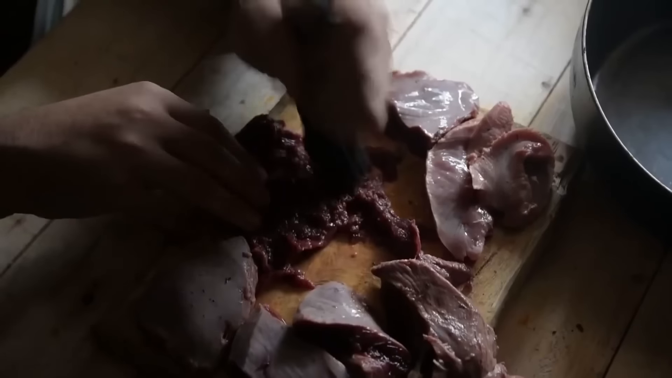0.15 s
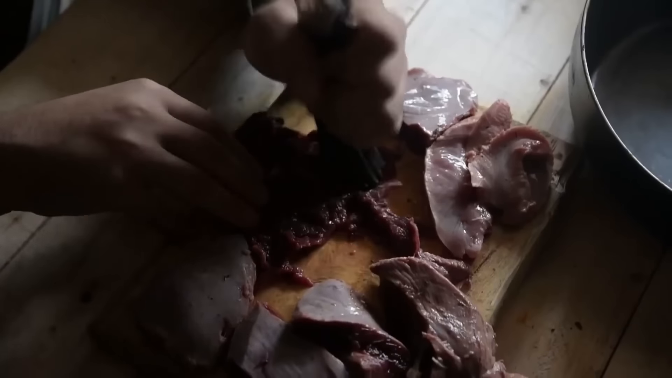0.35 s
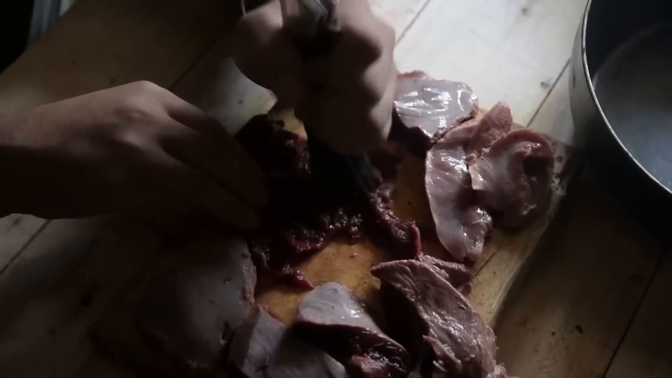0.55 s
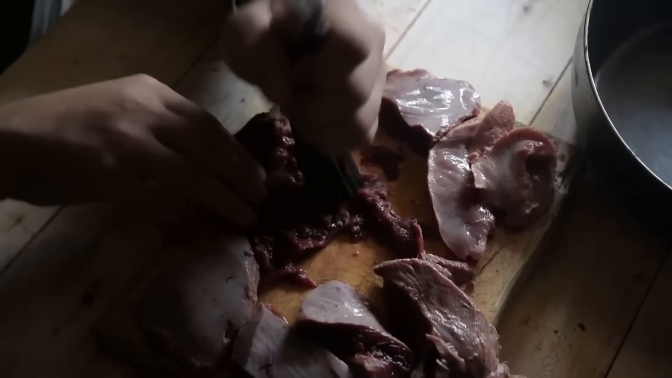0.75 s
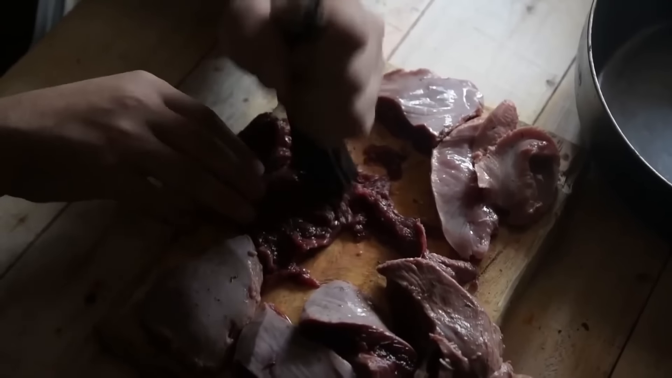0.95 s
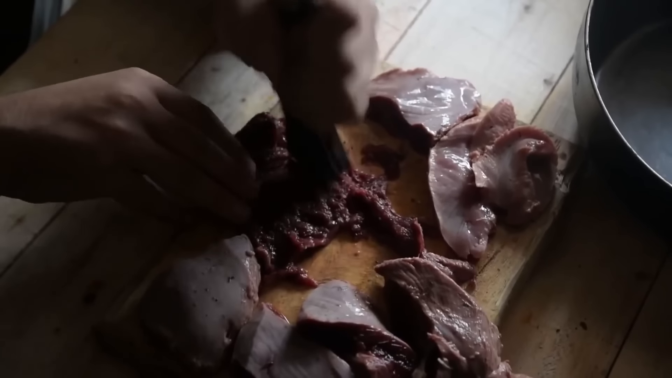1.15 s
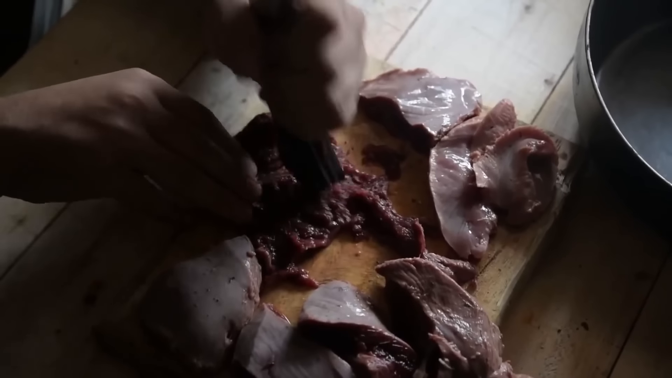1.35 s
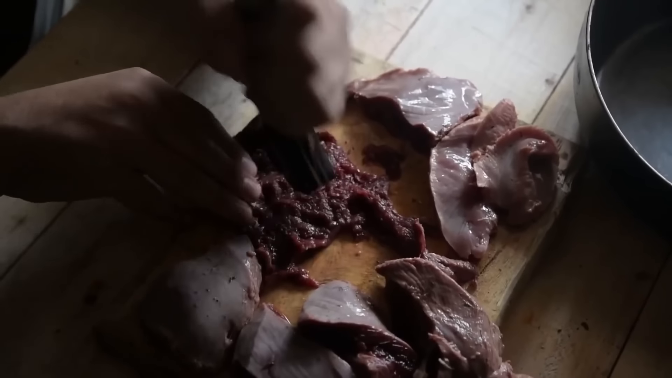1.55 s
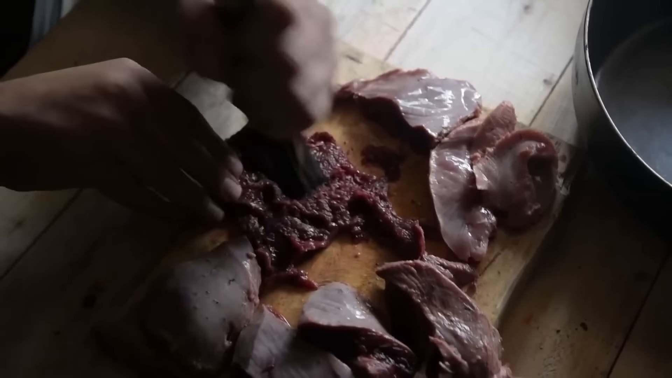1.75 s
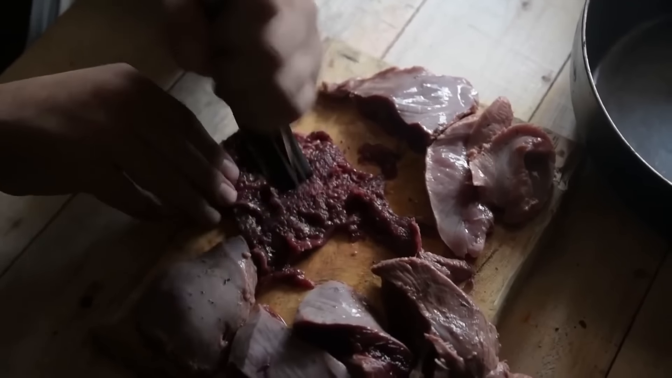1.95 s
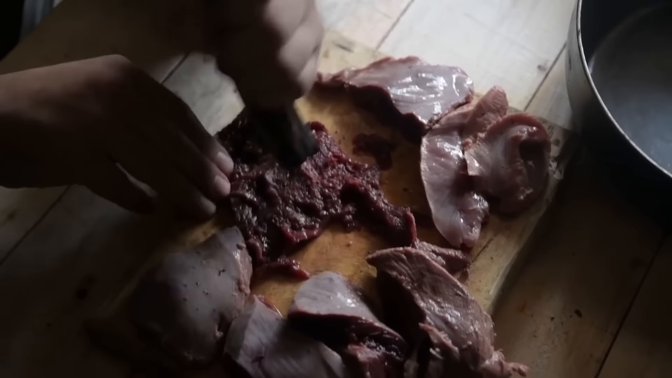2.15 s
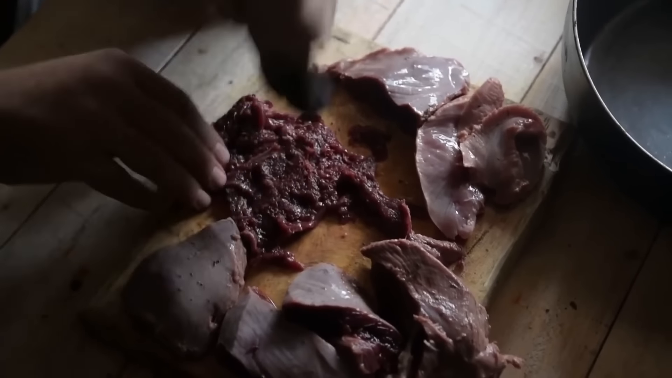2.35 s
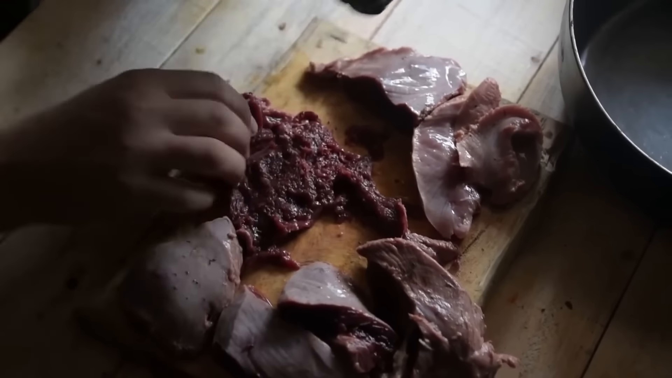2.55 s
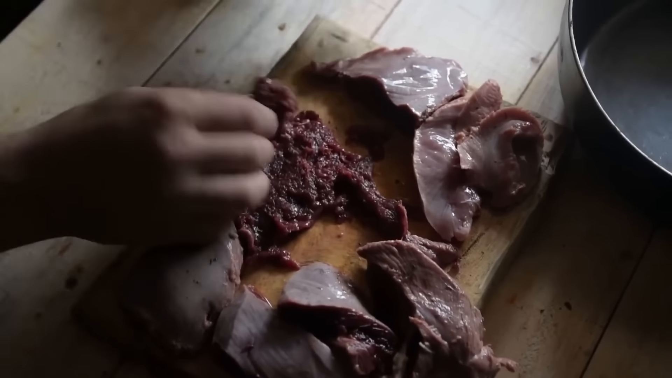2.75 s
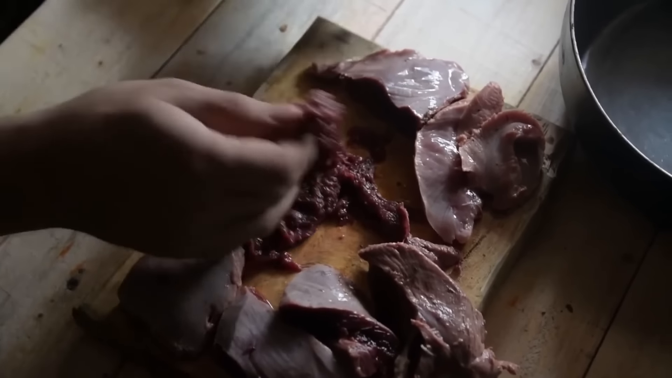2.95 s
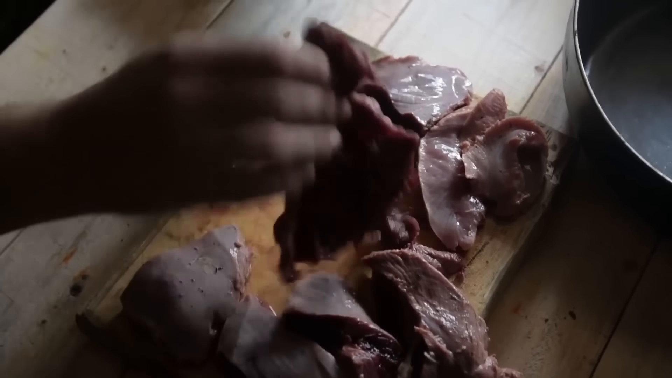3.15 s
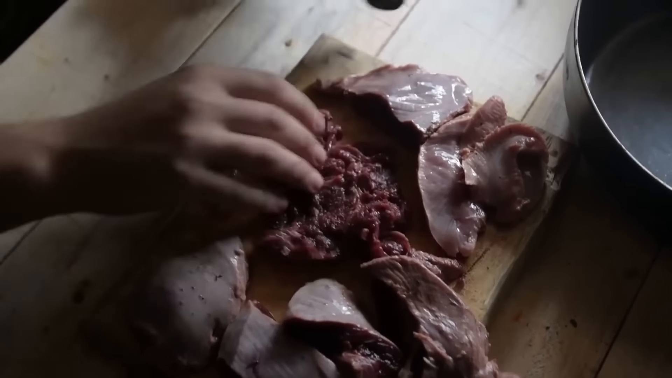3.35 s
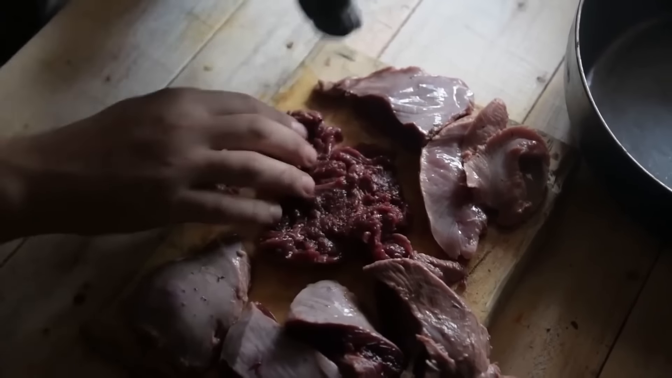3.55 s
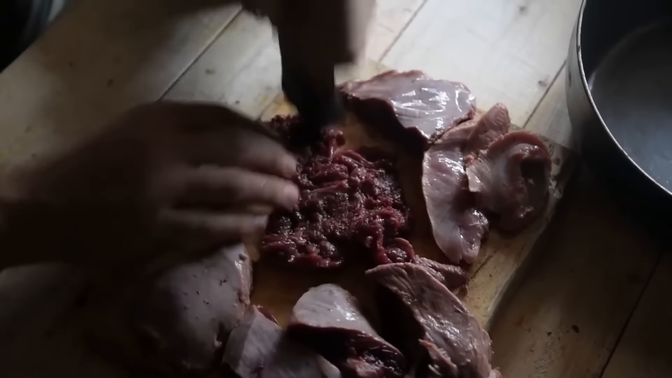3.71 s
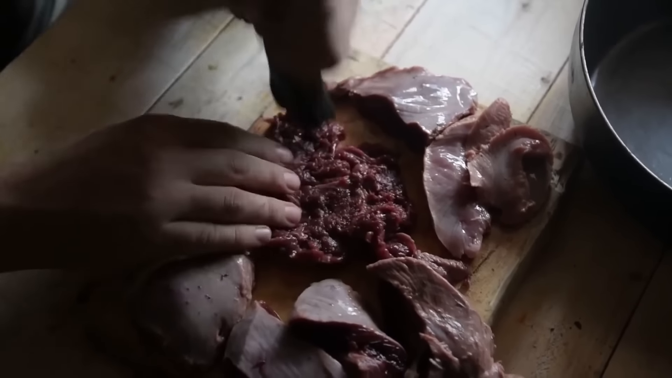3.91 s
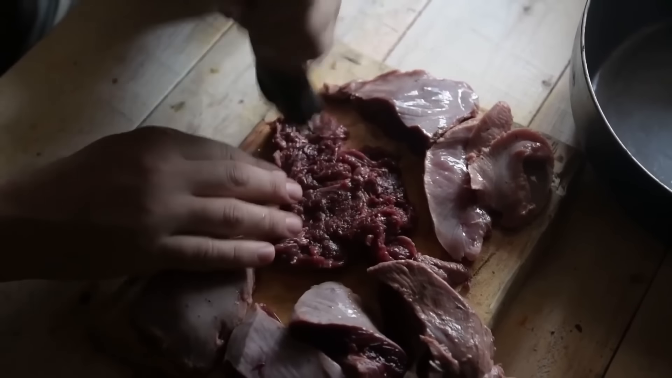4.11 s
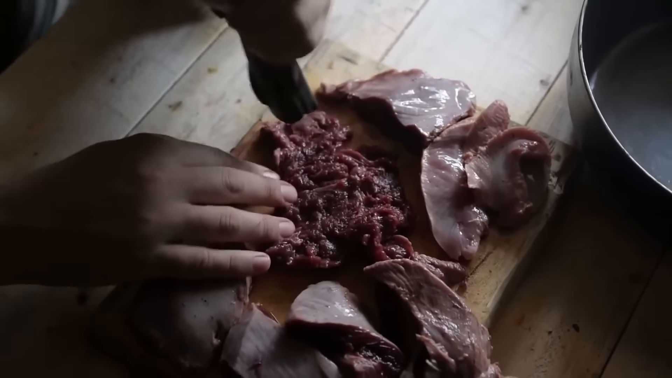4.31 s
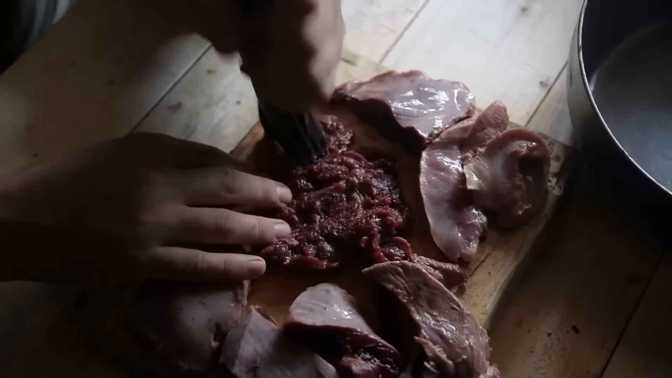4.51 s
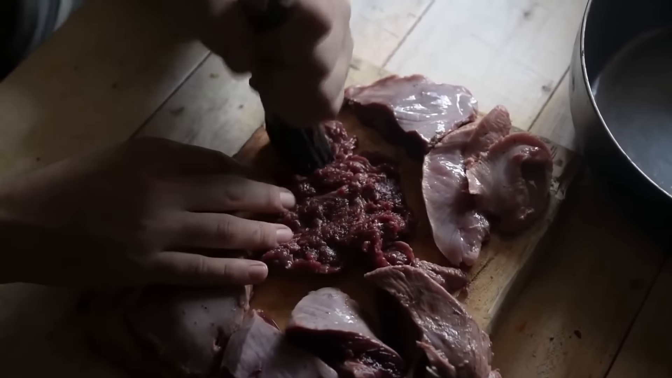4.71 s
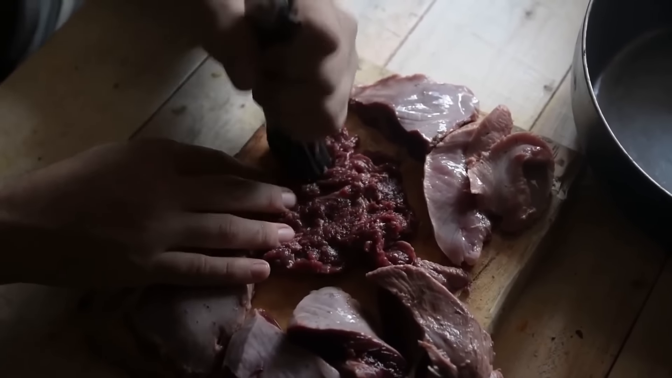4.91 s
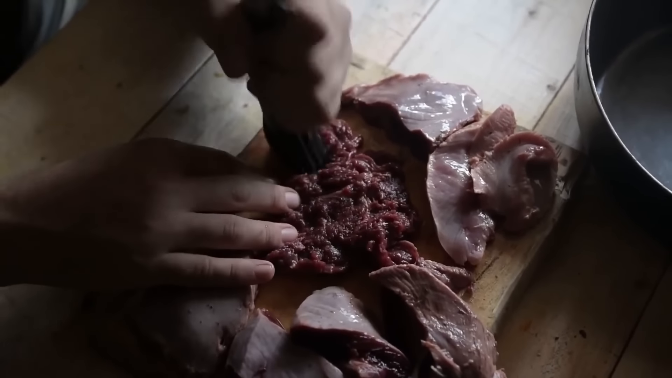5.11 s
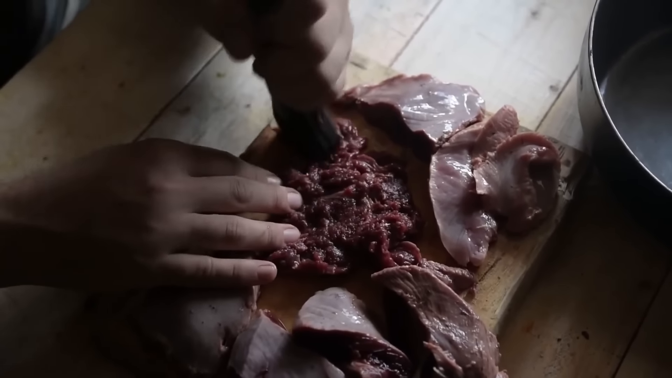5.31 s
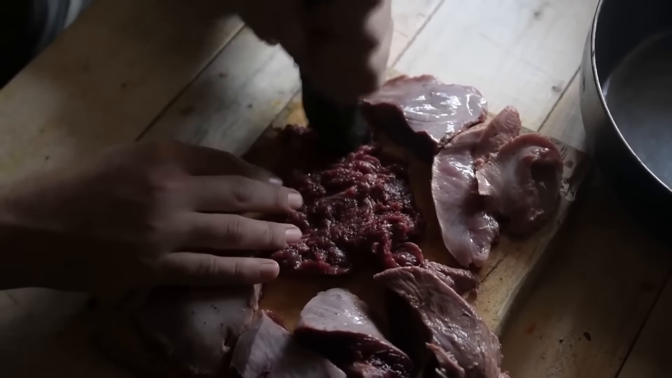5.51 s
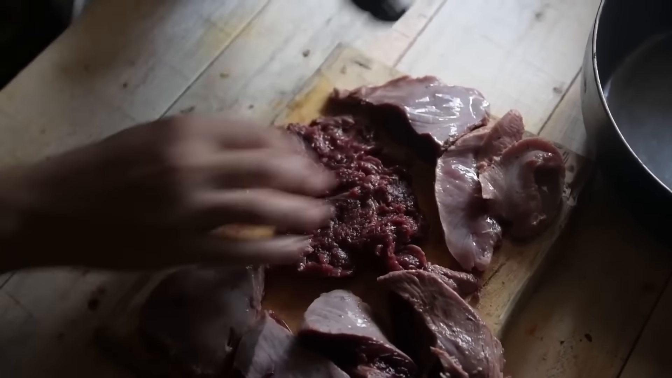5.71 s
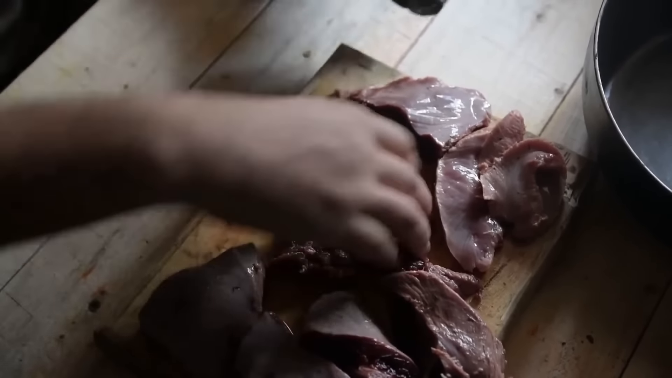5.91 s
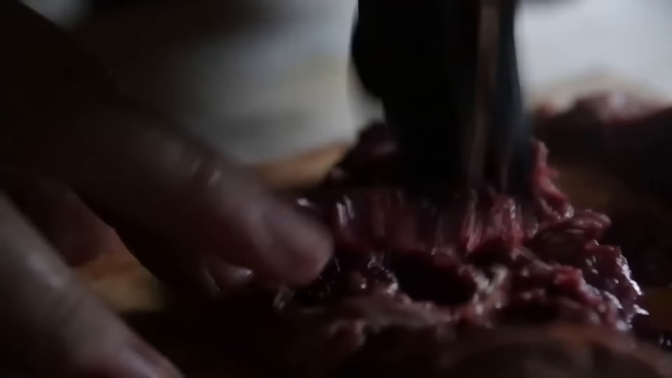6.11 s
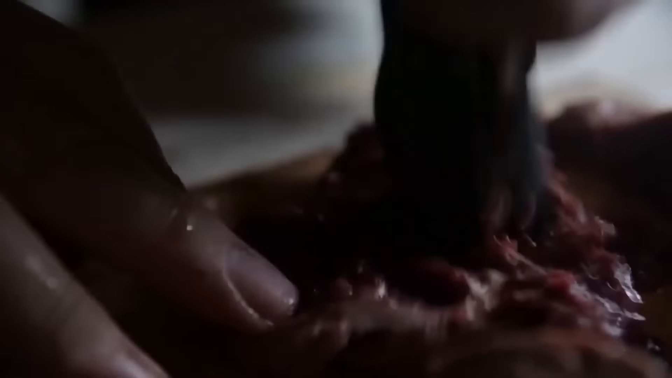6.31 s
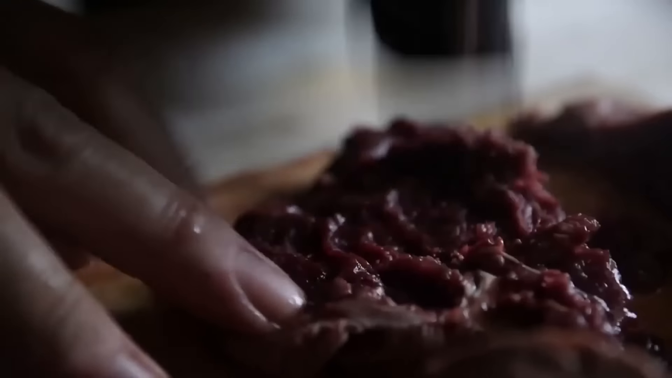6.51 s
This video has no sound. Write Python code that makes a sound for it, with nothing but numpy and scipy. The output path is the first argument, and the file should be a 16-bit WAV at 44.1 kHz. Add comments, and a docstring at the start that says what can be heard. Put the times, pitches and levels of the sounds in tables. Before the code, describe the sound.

A spiked mallet pounds raw meat on a wooden board on a table, heard up close in a small kitchen. From the start until about 2.3 seconds, dull thuds come evenly, about five a second, each with a wet smack and sticky crackle. The loose board sometimes knocks back, and a harder blow lands at 1.7. From 2.4 to 3.7 the pounding stops while a hand lifts and turns the meat with soft squelches, light wooden bumps and a sharp wet slap near 3.35. Two heavy blows at 3.8 and 4.0 begin a second run, which continues more lightly, with the board clattering, until about 5.7. After a brief gap, two more heavy, wet blows land at 6.1 and 6.4. The hardest hits are slightly overloaded. Reflections are short and tight, and a faint rumble and hiss continue underneath.

```python
"""A small kitchen: close up, a spiked mallet pounds raw meat on a wooden board lying on a plank table.
Each blow smacks the wet meat, then thuds through board and table. The spikes tear free with sticky
crackles, the loose board knocks back, and a hand turns the meat between the bursts.
Short reflections and a bed of rumble and hiss sit behind; the hardest blows overload softly."""
import sys
import numpy as np
from scipy import signal
from scipy.fft import rfft, irfft, next_fast_len
from scipy.io import wavfile
from scipy.ndimage import uniform_filter1d

SR = 44100
rng = np.random.default_rng(int(sys.argv[2]) if len(sys.argv) > 2 else 0)


def unload_wav(signal):
    """Save mono or channel-first audio to the path in sys.argv[1] as 16-bit WAV at rate SR, clipped to [-1, 1]."""
    wavfile.write(
        sys.argv[1],
        SR,
        np.round(np.clip(np.atleast_2d(signal).T, -1, 1) * 32767).astype(np.int16),
    )


N = 289737

# The mallet lands: t/s, thud/dB, table boom/dB, board knock/dB, squeezed meat/dB
BLOWS = [(0.056, -22, -0.5, -11.5, -44), (0.235, -31, -0.5, -14.5, -50.5), (0.42, -33, 1, -19, -43),
         (0.604, -34, 1.5, -12, -47), (0.794, -29.5, 7, -6, -45.5), (0.989, -25.5, 1.5, -7.5, -47),
         (1.17, -25.5, 2.5, -7, -43), (1.362, -25.5, 3.5, -7, -45), (1.536, -26, 4.5, -9, -53.5),
         (1.72, -14.5, -3.5, 1, -44), (1.92, -39, 5, -15, -44), (2.101, -37.5, 5.5, -10, -45),
         (2.302, -25, -3, -12.5, -42), (3.831, -11, -9, 0.5, -45.5), (4.031, -7.5, -11, 2, -43),
         (4.245, -29, -7, -8, -47), (4.508, -27, 0.5, -13, -37.5), (4.742, -30.5, 4, -15.5, -40.5),
         (4.974, -41, -7, -15, -46), (5.173, -30.5, 6, -4.5, -45.5), (5.358, -38.5, -12, -12.5, -46.5),
         (5.565, -28.5, -11, -22.5, -42.5), (6.112, -9.5, -9.5, -14, -39), (6.363, -9, -6.5, -10, -36)]
# The loose board or the meat drops back: t/s, thud/dB, table boom/dB, board knock/dB
KNOCKS = [(.935, -29, -8.5, -10), (1.683, -60.5, -8, 7.5), (1.868, -23.5, -4.5, -1), (1.992, -45, 2, -5.5),
          (2.642, -33, -12, -14), (3.39, -33, -8.5, -17), (3.537, -24, -12, -8.5), (3.71, -34, -9, -19.5),
          (3.937, -36.5, -0.5, -5.5), (4.141, -36, -3, 4), (4.224, -44, 2, 10.5), (4.346, -29, -9, -14.5),
          (4.587, -46, -6.5, 2), (5.021, -37.5, -10, -11), (5.219, -37.5, 3.5, -3.5), (5.4, -42, 2.5, -3),
          (5.595, -41.5, -9.5, 7), (5.716, -48.5, 17, -12)]
# Boom, body, knock and clack bands of a thud; the others are set against the body: from/Hz, to/Hz
THUD_BANDS = [(90, 170), (170, 400), (400, 800), (800, 1800)]
# Modes of board and table: f/Hz, level/dB, t60/s
WOOD_MODES = [(46.87, -11.5, .4), (70, -10, 0.37), (90, -22.5, .2), (120, 3.5, 0.28), (130.1, 4, 0.24),
              (160.3, 2.5, 0.19), (209.4, 2.5, 0.16), (243, -1, 0.18), (287, 1, 0.11), (311.2, -1.5, 0.073),
              (407.5, -6, 0.11), (525, -29.5, .08), (559, -1, 0.055), (602.2, -1, 0.08),
              (721.4, -8.5, 0.065), (911, -13, 0.11), (1032, -2.5, 0.031), (1193, -20, 0.081),
              (1405, -24, 0.045), (1562, -9, 0.047), (2037, -15, 0.055)]
# Dark and bright wash of weak plank modes: f/Hz, level/dB
PLANKS_LOW = [(60, 3.5), (150, 20), (350, 14.5), (700, -3.5), (2000, -29.5)]
PLANKS_HIGH = [(200, -7.5), (500, 9.5), (1200, 8.5), (2500, -11.5), (6000, -31)]
# Wet smacks: mid-rise t/s, peak level/dB, air pocket f/Hz, brightness (spit over slap)/dB, sizzle t60/s
SMACKS = [(0.0498, -22.5, 6600, 16, .071), (0.098, -37, 8900, 21, .12), (0.1036, -39.5, 2270, -8, .035),
          (0.1324, -44, 8950, 35, .074), (0.194, -38.5, 5850, 5, .02), (.2306, -28.5, 5170, 4, .026),
          (0.2593, -33.5, 2050, 14, .055), (.3007, -39.5, 9200, 24, .17), (0.413, -19, 3750, 13.5, .034),
          (0.4452, -26.5, 8100, 16, .098), (0.484, -45, 1620, 11, .044), (0.601, -33, 2000, 16.5, .13),
          (0.632, -40, 2710, 15, .077), (0.662, -42, 6200, 12, .03), (.671, -41, 6450, 21, 0.067),
          (.6921, -35, 7990, 42, .032), (.788, -31, 4130, 13, .055), (.8666, -36, 9100, 24, .047),
          (0.9846, -32.5, 2060, 18, .14), (1.0383, -45.5, 5600, 19, 0.13), (1.1608, -28, 3800, 13, .05),
          (1.2035, -30, 1240, 12.5, .046), (1.2229, -33.5, 5330, 2, .03), (1.358, -36, 2100, 6, .11),
          (1.3874, -36, 8900, 27, .17), (1.5301, -30, 9000, 8.5, .045), (1.5576, -37.5, 2160, -22, .13),
          (1.594, -39, 8800, 40, .055), (1.6841, -44, 1100, 3, .16), (1.716, -25.5, 1100, 1, .075),
          (1.773, -42.5, 9000, 39, .07), (1.9089, -16, 1540, 3, .026), (1.974, -32.5, 9500, 52, .045),
          (2.0945, -20, 1570, 10.5, .02), (2.1587, -29, 7300, 8.5, .055), (2.2928, -19.5, 3540, -1.5, .12),
          (2.3422, -30, 9100, 16, .042), (2.3543, -32.5, 8000, 50, .033), (2.4232, -45, 1660, 1, .055),
          (2.6864, -46, 3930, 1, .1), (2.7834, -46, 8800, 17, 0.16), (2.826, -45.5, 1190, 17, 0.055),
          (2.8496, -45, 8830, 39, .055), (2.895, -43, 4020, 22, 0.2), (3.0156, -50, 9050, 43, .1),
          (3.116, -40.5, 8900, 55, .055), (3.1815, -46.5, 4800, 13, .081), (3.3399, -36, 9300, 21, .02),
          (3.346, -16, 4800, 15, .05), (3.352, -13.5, 2950, 12, .03), (3.357, -17.5, 1635, 13, .025),
          (3.3933, -37, 9000, 33, .034), (3.4979, -49, 3600, 10, 0.068), (3.6055, -38.5, 3880, -4, .12),
          (3.7389, -51, 9450, 34, 0.051), (3.817, -44, 3840, -3.5, .087), (3.833, -33, 960, -12.5, .068),
          (3.9616, -40.5, 8800, 6, .055), (4.0142, -24.5, 8900, 12.5, .13),
          (4.0318, -22.5, 1000, 0.5, .018), (4.0638, -21.5, 4130, 9, .018), (4.242, -21.5, 1780, 8, .025),
          (4.2746, -17, 9200, 27, .073), (4.3185, -38.5, 3480, 14, .036), (4.502, -26, 5740, 2.5, .031),
          (4.5402, -46, 4180, -1, .17), (4.586, -42, 5700, 3, 0.043), (4.7373, -15.5, 6140, 2, .018),
          (4.776, -31, 6920, -1, .09), (4.8016, -38, 1570, -5, .055), (4.9656, -33, 6170, 1, .12),
          (5.025, -43.5, 8990, 6, .055), (5.17, -25.5, 1870, 6, .055), (5.2133, -24, 9200, 3, .092),
          (5.3547, -36, 9800, 9.5, .1), (5.4, -41, 5230, 3, .12), (5.49, -55, 3560, 5, .02),
          (5.5493, -29.5, 7600, 10, .055), (5.564, -33, 5900, 14, .055), (5.584, -30.5, 9600, 16, .055),
          (6.1095, -22.5, 1150, -11, .13), (6.1593, -37.5, 4830, 46, .17), (6.295, -52, 2610, -4, .055),
          (6.3537, -19, 2580, 11, .062), (6.418, -36.5, 8900, 16, .055)]
# A smack's three colours, from flat slap to thin spit: f/Hz, relative level/dB
SLAP_TONE = [(500, -19.5), (900, -11), (1500, 1), (2200, -7), (3500, -22.5), (6000, -40.5)]
SQUISH_TONE = [(800, -122), (2000, -10), (3500, 5.5), (5500, 7), (8000, -7), (13000, -15.5), (16000, -34)]
SPIT_TONE = [(3000, -48.5), (6000, -3.5), (7500, 0.5), (9200, 8), (10500, -0.5), (13000, -6.5),
             (16000, -18)]
# A smack's left-right phase spread: f/Hz, spread/rad
SMACK_PHASE_SPREAD = [(1000, 0.033), (2500, 0.58), (5000, 0.39), (12000, 0.54)]
# Moves of the hand: loudest t/s, level/dB, swell/(dB/s), fade/(dB/s)
HAND_MOVES = [(1.849, -50, 42.5, 150), (2.426, -44.5, 346.5, 337), (2.66, -53, 899, 201),
              (2.83, -51.5, 74, 96.5), (3.356, -34, 1504.5, 893), (3.612, -43.5, 194, 395),
              (5.764, -53.5, 250, 148.5)]
# Colour of sticky meat and of the noise bed: f/Hz, relative level/dB
STICKY_TONE = [(300, -36.5), (700, -3), (1200, -7.5), (2100, -4), (3500, -3.5), (6500, -8.5), (9000, -6.5),
               (12000, -15), (16500, -19)]
HISS_TONE = [(21, -38), (35, -3), (268, -1), (338, -3.5), (898, -8.5), (971, -8), (1220, -9.5),
             (1500, -9.5), (2390, -12), (2720, -11.5), (14100, -16), (16500, -20.5)]
# Stereo likeness of the noise bed: f/Hz, left-right correlation
HISS_CORRELATION = [(60, 0.56), (240, 0.11), (950, 0.32), (3770, 0.3), (15000, -0.022)]
# Where each layer sits in the stereo image: f/Hz, left over right/dB
WOOD_PAN = [(60, 1), (240, -1.5), (950, -2.5), (3000, -6.5)]
SMACK_PAN = [(1000, -1.5), (4000, -1), (9000, -4), (14000, -3.5)]
HISS_PAN = [(60, -2), (240, 0), (950, -1), (3770, 0.5), (15000, 0)]
# Decay of the kitchen: f/Hz, t60/s
ROOM_DECAY = [(100, 0.34), (400, 0.15), (2000, 0.076), (8000, 0.06), (16000, 0.025)]
# Colour of its reflections: f/Hz, level/dB
ROOM_TONE = [(100, -33), (400, -19), (1500, -3.5), (8000, -3.5)]


def board_and_table():
    """The weight of the scene: mallet blows cushioned by meat, and knock-backs with a harder attack."""
    wood = np.zeros(N + N % 2)
    for start, *levels, _ in BLOWS:
        add(wood, start, thud(*levels, touch_db=-10, clack_db=-8, ring_scale=1))
    for start, *levels in KNOCKS:
        add(wood, start, thud(*levels, touch_db=-2.5, clack_db=-12.5, ring_scale=0.97))
    pan = gain_of(curve(WOOD_PAN, np.fft.rfftfreq(len(wood), 1 / SR)) / 2)
    return irfft(rfft(wood) * np.array([pan, 1 / pan]))[:, :N]


def thud(level_db, boom_db, knock_db, touch_db, clack_db, ring_scale):
    """One hit on wood: the table gives once, the modes ring and countless weak ones blur into a wash."""
    t, hz = np.arange(10240) / SR, np.fft.rfftfreq(10240, 1 / SR)
    force = chatter(boom_db, touch_db)
    push = gain_of(-5) * np.sin(2 * np.pi * np.minimum(80 * t, 1))  # one cycle of 80 Hz
    # each hit lands on another spot, which sets the loading, strength and sign of each mode
    mode_hz, mode_db, t60 = np.transpose(WOOD_MODES)[:, :, None]
    detune, strength, sign = rng.standard_normal((len(WOOD_MODES), 3)).T[:, :, None]
    phase = 2 * np.pi * mode_hz * (1 + 0.0065 * detune) * t
    ring_db = mode_db + 2.3 * strength - 60 * t / (t60 * ring_scale)
    rings = np.sign(sign) * gain_of(ring_db) * np.sin(phase)
    planks = gain_of([curve(PLANKS_LOW, hz), curve(PLANKS_HIGH, hz)])
    wash = irfft(rfft(rng.standard_normal((2, len(t)))) * planks)
    wash *= gain_of(-60 * t / (np.c_[[.16, .08]] * ring_scale))  # the bright wash dies faster
    sound = signal.fftconvolve(force, rings.sum(0) + wash.sum(0) + push)[:len(t)]
    # even out the bands, then EQ to this hit's balance
    clack_db += 0.99 * knock_db  # the board's clack follows its knock
    balance = [(25, boom_db - 18.5), (60, boom_db - .6), (130, boom_db), (260, 0.011), (560, knock_db),
               (1100, clack_db), (1600, clack_db - 5), (2050, clack_db + .6), (4000, clack_db - 12.5)]
    power = abs(rfft(sound)) ** 2
    bands = [(np.sqrt(lo * hi), 10 * np.log10(power[(hz > lo) & (hz <= hi)].sum()))
             for lo, hi in THUD_BANDS]
    body_db = bands[1][1]
    sound = equalise(sound, gain_of(curve(balance, hz) - curve(bands, hz) + body_db))
    return gain_of(level_db) * sound / peak_rms(sound, 800)


def chatter(boom_db, touch_db):
    """Force of a hit: a sharp touch, then board chatter, longer when more goes into the table."""
    chatter_ms = np.clip(7 + 0.64 * boom_db, 1, 40)
    age = np.arange(2048) / SR * 1000 / chatter_ms
    force = rng.standard_normal(len(age)) * age ** 2 * np.exp(-2 * age)
    envelope = np.minimum(age, 1) * np.exp(-np.maximum(age - 1.5, 0))
    for _ in range(3):  # flatten the spectrum to drive every mode about equally
        force = irfft(np.exp(1j * np.angle(rfft(force)))) * envelope
    force /= np.linalg.norm(force)
    force[0] = gain_of(touch_db)
    return force


def smacks(rise_ms=3.5, snap_t60_s=0.026, lag_spread_ms=0.035, spit_share=0.37):
    """Wet meat bursts with a sharp snap and a sizzling tail, coloured by ringing pockets of air."""
    t, hz = np.arange(4096) / SR, np.fft.rfftfreq(4096, 1 / SR)
    slap, squish, spit = (unit_rms(gain_of(curve(p, hz))) for p in (SLAP_TONE, SQUISH_TONE, SPIT_TONE))
    width = np.clip(0.34 * np.sqrt(hz / 7000), 0, .7)  # the treble sounds wider in stereo than the lows
    rise_s = rise_ms / 1000
    window = np.minimum(t / rise_s, 1) ** 2.3 * np.clip(1.5 - 1.5 * t / t[-1], 0, 1)
    since_peak = np.maximum(t - rise_s, 0)
    out = np.zeros((2, N))
    for at, level_db, pocket_hz, bright_db, t60 in SMACKS:
        decay = gain_of(-60 * since_peak / snap_t60_s) + 0.4 * gain_of(-60 * since_peak / t60)
        burst = crackle((2, len(t)), 5.4) * window * decay
        slap_db, spit_db = -(1 - spit_share) * bright_db, spit_share * bright_db - 2
        tone = gain_of(slap_db) * slap + 0.86 * squish + gain_of(spit_db) * spit
        tone *= air_pocket(hz, pocket_hz, 3.34 * min(1, 3500 / pocket_hz), 0.071)  # small ones are weak
        for stray_hz in 1200 * 6 ** rng.random(3):
            tone *= air_pocket(hz, stray_hz, 0.7, 0.062)
        left, other = rfft(equalise(burst, tone))
        # each smack bursts at another spot, so its left-right timing and balance shift
        ripple = smooth_noise(len(hz), 100)
        lag_s = lag_spread_ms / 1000 * rng.standard_normal()
        phase = curve(SMACK_PHASE_SPREAD, hz) * ripple + 2 * np.pi * hz * lag_s
        right = np.exp(1j * phase) * (np.sqrt(1 - width ** 2) * left + width * other)
        pan = gain_of((curve(SMACK_PAN, hz) + 1.5 * rng.standard_normal()) / 2)
        gain = gain_of(level_db) / peak_rms(irfft(left), 100)
        add(out, at - rise_s / 2, gain * irfft(np.array([left * pan, right / pan])))
    return out


def air_pocket(hz, centre_hz, boost, width):
    """Resonant peak of trapped air; width is a fraction of its pitch."""
    return 1 + boost / (1 + ((hz - centre_hz) / (width * centre_hz)) ** 2)


def squeezes(lead_s=0.012, suck_s=0.076):
    """The meat gives just before the thud and sucks at the spikes in lumps until they are free."""
    t, out = np.arange(5120) / SR, np.zeros((2, N))
    attack = np.minimum(t / 0.0028, 1)
    sag_db = -12 * t / suck_s - 60 * np.maximum(t - suck_s, 0) / 0.03
    for start, *_, level_db in BLOWS:
        lumps_db = 1.1 * smooth_noise(len(t), 300)
        add(out, start - lead_s, sticky_meat(len(t)) * attack * gain_of(level_db + sag_db + lumps_db))
    return out


def handling(range_db=25.5):
    """Fingers slide over, lift and flop the meat: sticky crackle swells and fades with each move."""
    out = np.zeros((2, N))
    for at, level_db, swell, fade in HAND_MOVES:
        t = np.arange(-range_db / swell, range_db / fade, 1 / SR)
        below_peak_db = np.maximum(-swell * t, fade * t)
        texture = sticky_meat(2 * next_fast_len(len(t) // 2 + 1))[:, :len(t)]
        add(out, at + t[0], texture * gain_of(level_db - below_peak_db))
    return out


def sticky_meat(length):
    """Dense wet crackle, wide and a little to the right."""
    tone = gain_of(curve(STICKY_TONE, np.fft.rfftfreq(length, 1 / SR)))
    noise = equalise(crackle((2, length), 3.3), tone)
    return unit_rms(noise + 0.3 * noise[::-1]) * gain_of([[-1.5], [1.5]])


def crackle(shape, spread_db):
    """Tiny wet films burst: noise whose level jumps every 16 samples."""
    sizes = rng.exponential(1, (shape[0], shape[1] // 16 + 1))
    jumps = np.repeat(sizes, 16, axis=1)[:, :shape[1]]
    return rng.standard_normal(shape) * gain_of(spread_db * np.minimum(jumps, 4))


def kitchen_reflections(near):
    """A tight room tail: sparse reflections of random sign, the treble dying first."""
    taps = np.zeros((2, SR // 2))
    at = np.arange(160, SR // 2 - 20, 20)
    at = at + rng.integers(0, 20, (2, len(at)))
    np.put_along_axis(taps, at, rng.choice([-1., 1.], at.shape), 1)
    hz, t, spectra = signal.stft(taps, SR, nperseg=256)
    decay = gain_of(-60 * t / curve(ROOM_DECAY, hz)[:, None])
    decay /= np.linalg.norm(decay, axis=1, keepdims=True)
    decay *= gain_of(curve(ROOM_TONE, hz))[:, None]
    tail = signal.istft(spectra * decay, SR, nperseg=256)[1] / np.sqrt(128 / 20)
    return signal.fftconvolve(near, tail, axes=1)[:, :N]


def noise_bed(level_db=-57):
    """Room rumble and microphone hiss, with faint drifting patches of colour."""
    frames, hz = N // 256 + 5, np.fft.rfftfreq(1024, 1 / SR)[:, None]
    left_re, left_im, other_re, other_im, drift = rng.standard_normal((frames, 513, 5)).T
    drift_db = 1.8 * unit_rms(uniform_filter1d(uniform_filter1d(drift, 12, 0), 10, 1))
    likeness = curve(HISS_CORRELATION, hz)
    left = left_re + 1j * left_im
    right = likeness * left + np.sqrt(1 - likeness ** 2) * (other_re + 1j * other_im)
    pan_db = curve(HISS_PAN, hz) / 2
    tone = gain_of(curve(HISS_TONE, hz) + drift_db + np.array([pan_db, -pan_db]))
    bed = signal.istft(np.array([left, right]) * tone, nperseg=1024, noverlap=768)[1]
    return gain_of(level_db) * unit_rms(bed[:, :N])


def gain_of(db):
    """Decibels to amplitude."""
    return 10 ** (np.asarray(db) / 20)


def unit_rms(x):
    """Scales to rms 1."""
    return x / np.sqrt(np.mean(x ** 2) + 1e-20)


def peak_rms(x, span):
    """Rms of the loudest stretch of span samples."""
    return np.sqrt(uniform_filter1d(x ** 2, span).max())


def smooth_noise(length, span):
    """Random wobble of rms 1, smoothed over span points."""
    return unit_rms(uniform_filter1d(rng.standard_normal(length), span))


def curve(points, hz):
    """Reads a table of f/Hz, value on a log-frequency axis."""
    f, value = np.transpose(points)
    return np.interp(np.log(hz + 1), np.log(f + 1), value)


def equalise(x, gain):
    """Minimum-phase EQ with one gain per rfft bin of x."""
    log_gain = np.log(np.maximum(gain, 1e-5))
    mirrored = np.concatenate([log_gain, log_gain[-2:0:-1]])
    phase = -signal.hilbert(mirrored).imag[:len(gain)]
    return irfft(rfft(x) * np.exp(log_gain + 1j * phase), x.shape[-1])


def add(mix, start_s, sound):
    """Lays a sound into the mix."""
    part = mix[..., round(start_s * SR):][..., :sound.shape[-1]]
    part += sound[..., :part.shape[-1]]


def scene():
    """Wood and wet meat up front, the kitchen and its noise bed behind."""
    near = board_and_table() + smacks() + squeezes() + handling()
    return near + kitchen_reflections(near) + noise_bed()


def record(dry):
    """A split-second drop-out before a late blow, soft overload on the hardest hits, a high cut."""
    start, end = 6.1, 6.1095  # drop-out, t/s
    gate = np.interp(np.arange(N) / SR, [start - .002, start, end, end + .0033], [1, .005, .0088, .97])
    saturated = 1.005 * np.tanh(dry * gate / 0.89)
    high_cut = signal.firwin(1023, cutoff=16750, window=("kaiser", 9), fs=SR)
    return signal.oaconvolve(saturated, high_cut[None], "same")


dry = scene()
out = record(dry)
unload_wav(out)
```